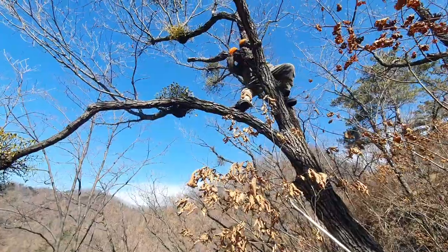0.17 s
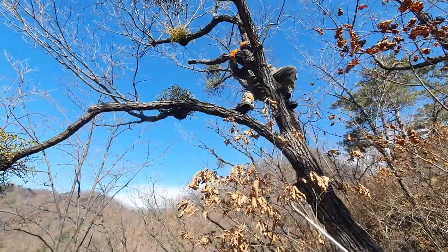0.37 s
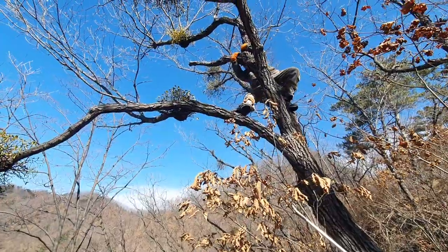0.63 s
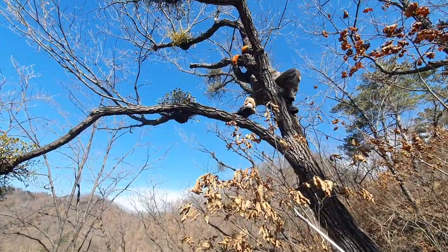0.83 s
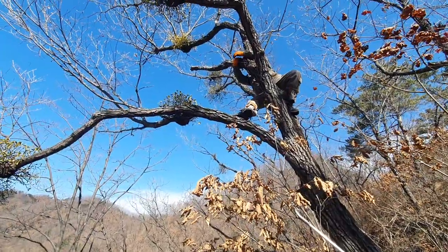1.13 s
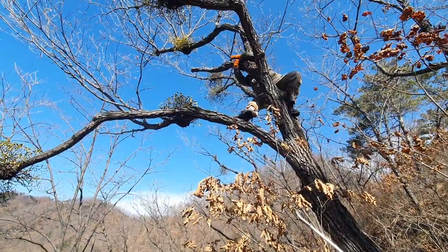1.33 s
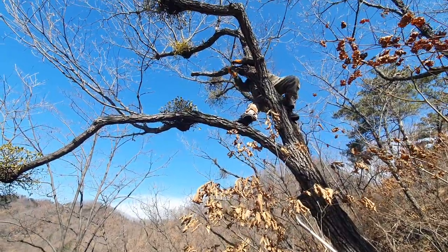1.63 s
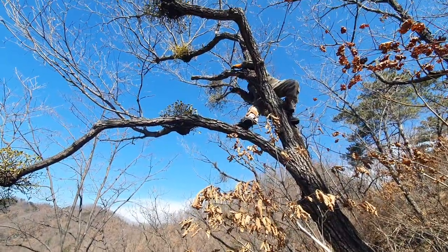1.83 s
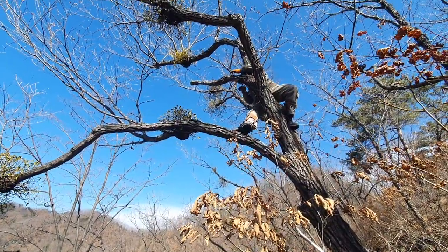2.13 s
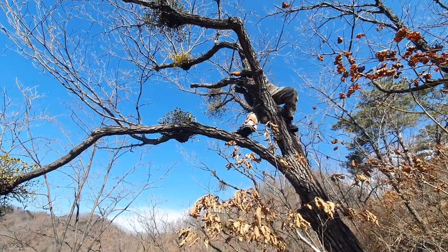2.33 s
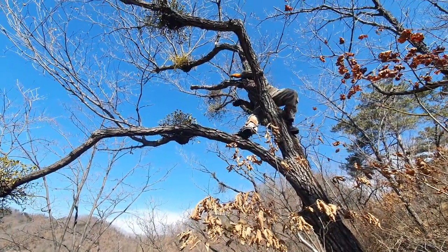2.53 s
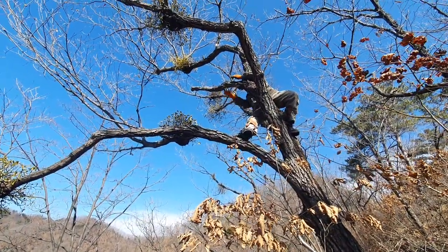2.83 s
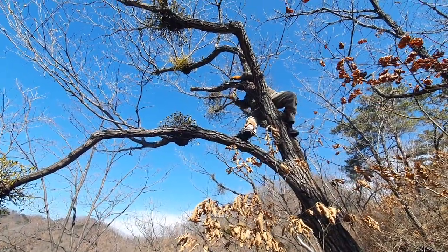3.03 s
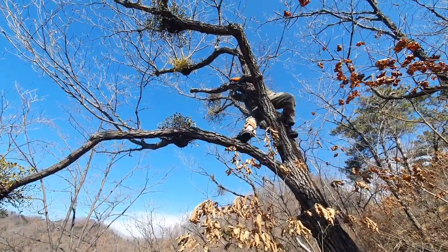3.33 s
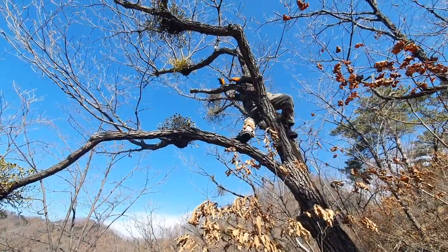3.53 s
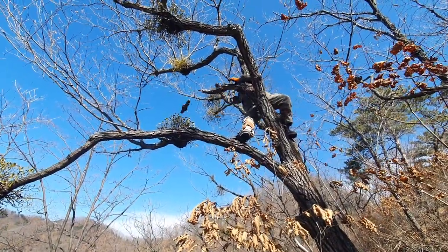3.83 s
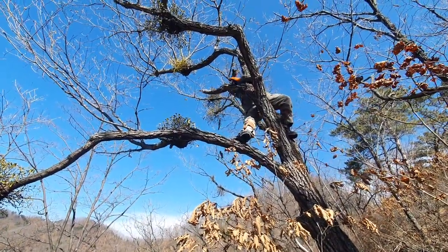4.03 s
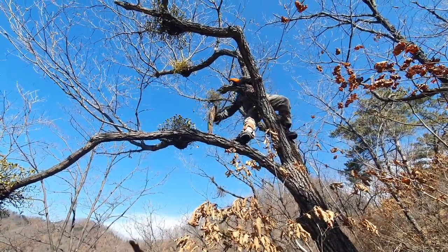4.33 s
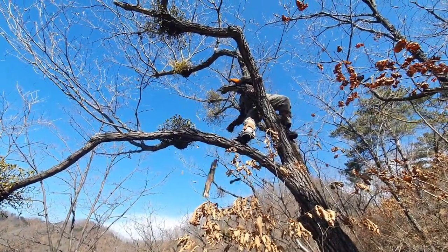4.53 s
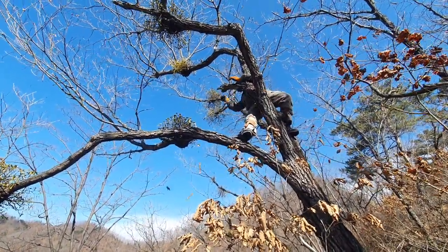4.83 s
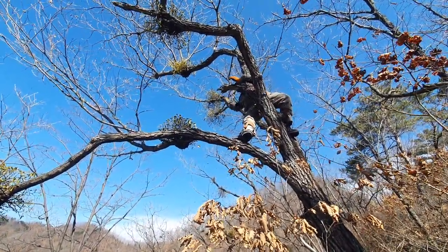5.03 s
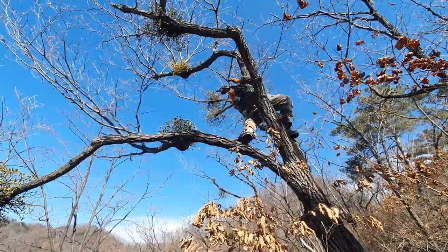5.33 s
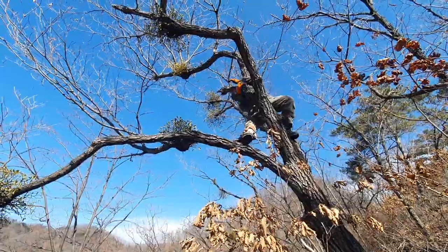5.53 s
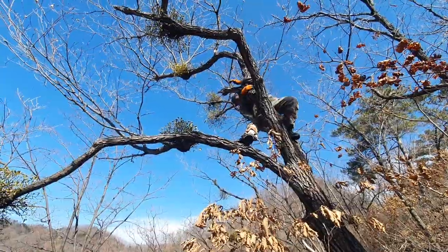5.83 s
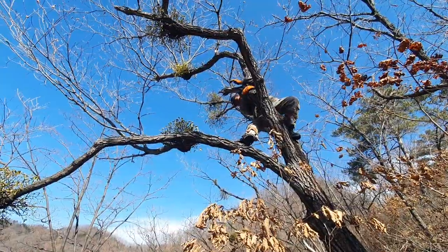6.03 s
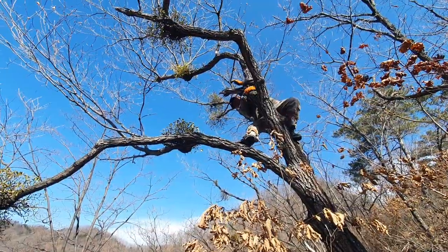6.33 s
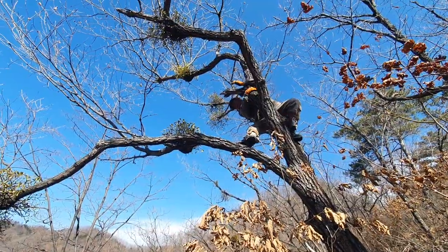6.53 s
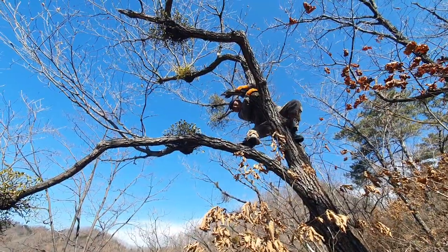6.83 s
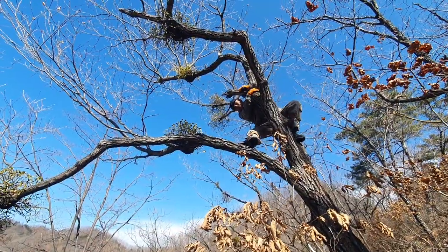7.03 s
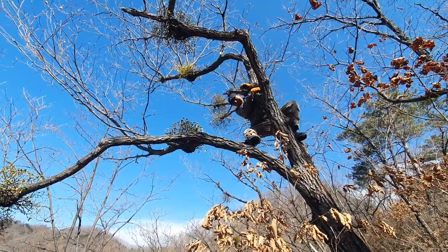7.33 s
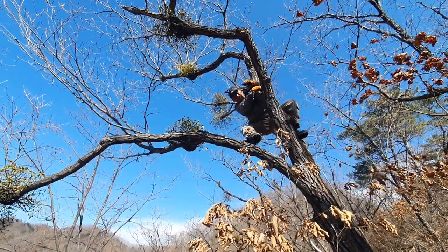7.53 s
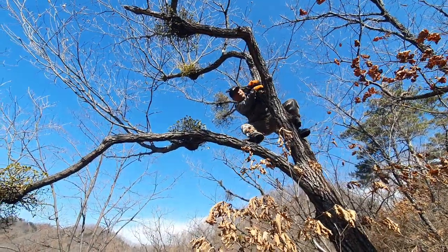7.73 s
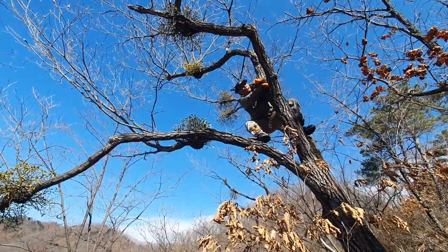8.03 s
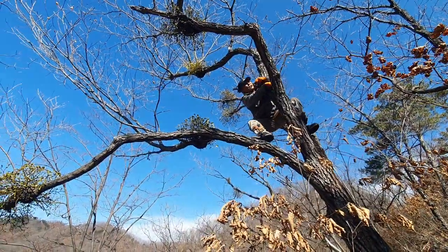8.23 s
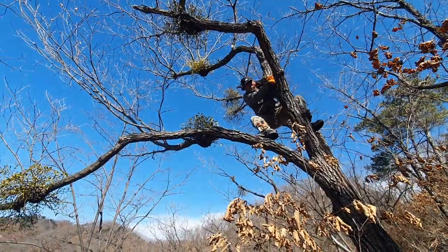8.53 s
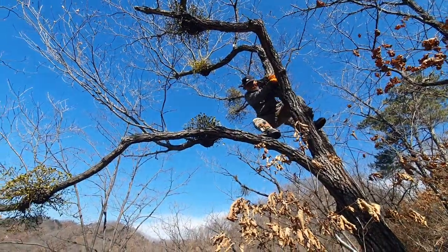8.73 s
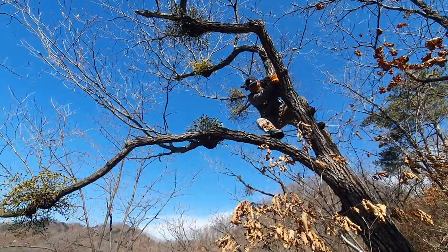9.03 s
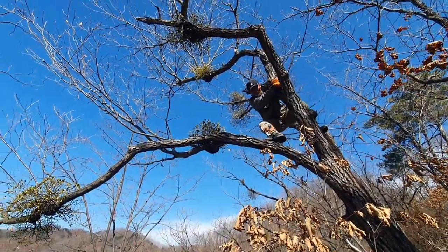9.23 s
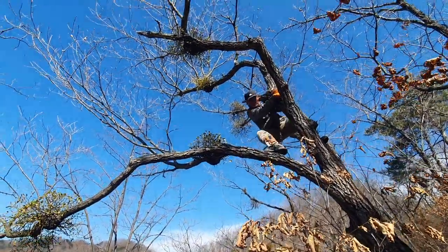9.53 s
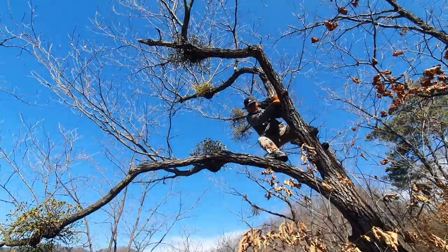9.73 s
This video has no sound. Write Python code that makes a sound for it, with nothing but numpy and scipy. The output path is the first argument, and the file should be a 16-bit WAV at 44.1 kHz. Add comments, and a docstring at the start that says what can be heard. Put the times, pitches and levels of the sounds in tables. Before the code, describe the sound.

Twigs snap and dry leaves crackle on a winter hillside as broken wood crashes, knocks hard on the ground and rolls through litter, faint crow beyond.

```python
"""Dead wood crashes into the dry leaves of a wooded winter slope: noise bursts with ringing fibres.
Two heavy chunks thud down, each a resonant knock over bouncing ground; wood tumbles in dense crackle.
Feet shift in sparser crackle, twigs snap, boots scuff, and wood knocks and creaks.
A crow caws far off in paired tones, the trunks give a thin echo, and filtered noise makes a light wind."""
import sys
import numpy as np
from scipy import signal
from scipy.fft import rfft, irfft, next_fast_len
from scipy.io import wavfile
from scipy.ndimage import uniform_filter1d

SR = 44100
rng = np.random.default_rng(int(sys.argv[2]) if len(sys.argv) > 2 else 0)


def generate_wav(signal):
    """Clip the signal to [-1, 1] and save it as 16-bit WAV at the path in sys.argv[1]."""
    frames = np.transpose(np.atleast_2d(signal))
    scaled = np.clip(frames, -1, 1) * 32767
    pcm = np.round(scaled).astype(np.int16)
    wavfile.write(sys.argv[1], SR, pcm)


N = 435708
TIME = np.arange(N) / SR
TOP_HZ = 16000

# All levels in the tables are relative; the functions add their own trims on top.
# gusts over a light, steady wind: middle_s, half_length_s, level_db
GUSTS = [(0.5, 0.32, -50.5), (1.1, 0.3, -52), (5.1, .4, -51)]
CALM_DB = -58
# distant caws: start_s, length_s, level_db
CAWS = [(0.0, 0.11, -68), (0.562, 0.26, -59), (1.412, .26, -60), (2.299, 0.24, -65.5), (3.173, 0.21, -65)]
# boots scuffing: middle_s, half_length_s, level_db
SCUFFS = [(2.202, 0.3, -66.5), (5.824, 0.072, -50), (6.47, 0.025, -57), (6.923, 0.05, -55),
          (7.348, 0.042, -50.5), (8.088, 0.087, -53.5), (8.564, 0.077, -59), (8.767, 0.063, -58),
          (9.543, 0.076, -57)]
# a bent branch creaks once: start_s, length_s, start_pitch_hz, end_pitch_hz, level_db
CREAK = (6.025, 0.07, 880, 660, -45)
# hollow knocks of wood on wood and root: start_s, pitch_hz, level_db
KNOCKS = [(5.303, 264, -33), (5.724, 398, -46), (5.835, 390, -47), (8.735, 1590, -48.5), (8.985, 149, -42)]
# weight shifting on dry leaves: middle_s, half_length_s, level_db
SHIFTS = [(0.1, 0.48, -58), (1.15, 0.39, -57.5), (8.05, 0.19, -59.5), (8.8, 0.24, -64), (9.42, 0.27, -62)]
# leaves never lie quite still; after a blow or the tumble they settle, fading evenly in dB
STILL_DB = -66.5
JOLT_DB, JOLT_FADE_DB_PER_S = -54.5, 34.5
SETTLE_DB, SETTLE_FADE_DB_PER_S = -43.5, 7.5
# the loudest twigs and stiff leaves breaking: start_s, crack_db, splinter_db, woody_body_db, ring_hz
SNAPS = [(0.051, -43, -38.5, -24, 4840), (0.161, -18.5, -43, -16, 2730), (0.253, -16.5, -57, -33, 3800),
         (0.425, -47, -41.5, -30, 3400), (0.737, -25, -38, -10.5, 3900), (0.788, -24.5, -59, 4, 1430),
         (1.038, -25, -43, -10, 6850), (1.055, -15.5, -48, -16, 1790), (1.461, -14.5, -44, -16, 3480),
         (1.569, -32, -43, -8, 1720), (1.685, -40.5, -41, -24, 5050), (1.709, -42, -42, -25, 5500),
         (1.747, -33, -50, -4.5, 3250), (1.805, -38, -49, -16, 3560), (2.46, -17, -30.5, -11.5, 4160),
         (2.482, -22, -38, -5, 3190), (2.503, -22, -62, 2.5, 1760), (2.549, -26, -42, -37, 7560),
         (3.295, -24, -32, -14.5, 3860), (3.427, -26, -40.5, -38, 3140), (3.809, -18, -35, -6, 2000),
         (3.827, -26, -35, -31, 6350), (3.989, -28, -48.5, -42, 4740), (4.274, -33.5, -37.5, -4.5, 4480),
         (5.035, -10, -32, -10.5, 2820), (5.937, -25, -32, -28, 5360), (5.982, -18, -32.5, -19, 3970),
         (6.018, -37, -31.5, -14, 2980), (6.241, -17, -40.5, -37, 4780), (6.446, -41, -35.5, -13.5, 4160),
         (6.472, -26, -34, -35, 3960), (6.654, -37, -34, -21, 2330), (6.712, -30, -34, -18.5, 2570),
         (7.266, -29, -40.5, -25, 4800), (7.748, -17.5, -53, -35, 5960), (8.383, -22, -59, -34, 4160),
         (8.718, -33, -47, -19, 5000), (9.175, -36.5, -43.5, -35, 2470), (9.269, -16, -46.5, -28, 6460),
         (9.441, -23, -51, -31, 7700), (9.557, -35, -42.5, -25, 5200)]
# wood tumbling through the litter, with the level of its steady ploughing
TUMBLE_START_S, TUMBLE_END_S, PLOUGH_DB = 4.83, 5.91, -40.5
# surges as the wood rolls, the last two gentle: middle_s, half_length_s, level_db
ROLLS = [(4.9, 0.03, -35.5), (5.125, 0.079, -33), (5.33, 0.033, -35), (5.81, 0.013, -42),
         (6.79, .14, -45.5), (7.31, 0.073, -49.5)]
# wood crashing into the litter: start_s, crack_db, splinter_db, woody_body_db, ring_hz
CRASHES = [(2.852, -4, -21, -17.5, 2080), (2.881, -1, -19.5, -13.5, 3520), (2.931, -26, -26, -14, 4300),
           (4.844, -24, -36.5, -8, 2310), (4.895, -27, -32.5, -13, 3240), (5.096, -13, -31, -2, 2380),
           (5.118, -16, -25, -33, 1770), (5.138, -3, -27.5, -23, 2620), (5.301, -8.5, -38, 1, 1960)]
# heavy chunks landing: strike_s, blow_db, ground_thump_db, contact_s, crushed_leaf_lead_s
LANDINGS = [(3.736, -6.5, -19.5, 0.0015, .011), (4.3727, -8.5, -18.5, 0.0011, .007)]
# resonances of the wood, one list per landing chunk: pitch_hz, width_hz, level_db
CHUNKS = [
    [(805, 93, -5), (1093, 136, 5), (1720, 100, -4.5), (2270, 268, -10), (3020, 290, -3), (4050, 270, -27)],
    [(750, 92, 4.5), (1074, 62, 1.5), (1560, 85, 3), (2720, 69, -3.5), (3900, 240, 1), (7260, 260, -7)],
]
# resonances of the springy forest floor: pitch_hz, level_db, t60_s
GROUND = [(75.6, -1.5, 0.34), (92, 5, 0.1), (121, 5.5, 0.12), (247, -4, 0.056), (305, -1, 0.086),
          (517, 2.5, 0.048)]
# direction of the activity: time_s, left_ear_lag_ms, left_minus_right_db
BEARING = [(0, 0.36, -4.5), (1.8, 0.29, -3), (2.5, 0.082, -5.5), (4.5, 0.076, -4), (5.8, 0.079, -2.5),
           (6.2, 0.19, -7), (7.6, 0.24, -5), (9.8, 0.36, -6)]
# spectrum of the wind rumble: frequency_hz, density_db (per Hz)
GUST = [(15, -31), (35, -8), (60, 2), (90, -0.5), (140, -5.5), (250, -18.5), (600, -52.5)]
# spectrum of the wind buffeting: frequency_hz, density_db (per Hz)
BUFFET = [(15, -2.5), (40, 2), (70, -6.5), (150, -16.5), (400, -46)]
# spectrum of the hillside hush: frequency_hz, density_db (per Hz)
AIR = [(90, -19), (170, -5.5), (350, -2), (600, -7), (1300, -14), (3000, -19.5), (7000, -24), (9100, -44),
       (12000, -48), (16000, -41.5)]
# spectrum of a dragging sole: frequency_hz, density_db (per Hz)
SCUFF = [(150, -12), (340, 0.5), (550, -5.5), (850, -5), (1700, -9), (3000, -10), (8000, -24)]
# spectrum of dry leaves: frequency_hz, density_db (per Hz)
LEAF = [(600, -27), (1400, -17), (2400, 0), (3800, 1.5), (5400, -1.5), (7400, -0.5), (9100, -16.5),
        (12000, -9), (16000, -8)]
# spectrum of stalks and woody crunch: frequency_hz, density_db (per Hz)
CRUNCH = [(120, -21), (260, -4), (450, -5), (750, -2), (1300, 1), (1900, 2.5), (3000, -7), (6000, -45)]
# spectrum of the bright part of a break: frequency_hz, density_db (per Hz)
TWIG = [(600, -25.5), (1500, -9), (2800, 0), (4200, 0.5), (5500, -1), (7500, 0), (9200, -17.5),
        (12000, -7.5), (16000, -12)]
# spectrum of a chunk's blow and its litter: frequency_hz, density_db (per Hz)
BLOW = [(100, 1), (250, 6.5), (400, -4.5), (1200, -1), (4000, -2.5), (5500, -9.5), (7500, -4),
        (9200, -28.5), (16000, -11)]


def undb(db):
    """Decibels to gain."""
    return 10 ** (np.asarray(db) / 20)


def unit(x):
    """Scale to rms 1."""
    return x / np.sqrt(np.mean(x ** 2))


def curves(table):
    """Each column after the first as a curve in time."""
    s, *columns = np.transpose(table)
    return [np.interp(TIME, s, c) for c in columns]


def add(out, s, x):
    """Mix a sound into both channels at time s."""
    i = int(s * SR)
    out[:, i:i + x.shape[1]] += x[:, :N - i]


def colour(x, points):
    """Causal minimum-phase filter with the given spectrum and unit power gain."""
    size = 2 * next_fast_len(x.shape[-1] // 2 + 1024)
    hz, db = np.transpose(points)
    bins_hz = np.arange(size // 2 + 1) * SR / size
    gain = unit(undb(np.interp(np.log(bins_hz + 1), np.log(hz), db)))
    # folding the cepstrum forward in time makes the filter causal
    cepstrum = irfft(np.log(gain))
    cepstrum[1:size // 2] *= 2
    cepstrum[size // 2 + 1:] = 0
    return irfft(rfft(x, size) * np.exp(rfft(cepstrum)))[..., :x.shape[-1]]


def resonate(x, hz, width_hz):
    """Two-pole resonance, gain 1 at its centre."""
    return signal.lfilter(*signal.iirpeak(min(hz, SR / 3), hz / min(width_hz, SR / 4), fs=SR), x)


def noise(size, apart):
    """Stereo noise; apart 0 is the same in both ears, 1 unrelated."""
    mid, side = rng.standard_normal((2, size))
    return unit(mid + apart * np.array([side, -side]))


def wander(size, span):
    """Random drift of rms 1, smoothed over span samples."""
    return unit(uniform_filter1d(rng.standard_normal(size), size=span))


def steady(x, span_s):
    """Even out the level over spans longer than span_s, keeping the fine grain."""
    return x / np.sqrt(uniform_filter1d(np.mean(x ** 2, axis=0), int(span_s * SR) + 1) + 1e-12)


def swells(table):
    """Power of smooth swells, each rising and falling about its middle."""
    return sum(undb(db) ** 2 * np.exp(-((TIME - s) / half_s) ** 2) for s, half_s, db in table)


def settling(s, db, fade_db_per_s):
    """Power of leaves disturbed at time s and coming to rest."""
    return (TIME >= s) * undb(db - fade_db_per_s * np.maximum(TIME - s, 0)) ** 2


def tumbling(fade_s=0.13):
    """1 while the wood tumbles, fading to 0 as it comes to rest."""
    return (TIME >= TUMBLE_START_S) * np.clip(1 - (TIME - TUMBLE_END_S) / fade_s, 0, 1)


def crisp(x, edge_hz=9000):
    """Only the brittle top of a sound."""
    return signal.sosfiltfilt(signal.butter(2, min(edge_hz, SR / 3), "high", fs=SR, output="sos"), x)


def crackle(rate, spread_db, ring_s, apart, hiss_db, clump_db, count=28):
    """Tiny leaf fractures, rate per second over count pitches; they clump, and a few are far louder."""
    t = np.arange(SR // 50) / SR
    out = 0
    for hz in np.geomspace(900, 14000, count):
        ring = noise(len(t), apart) * np.exp(-t / ring_s)
        ring = unit(ring + 3.5 * resonate(ring, hz, hz / 5))
        # one random column places each click, the other sets its level
        draws = rng.random((int(rate * N / SR / count), 2))
        clicks = np.zeros(N)
        clicks[(draws[:, 0] * N).astype(int)] = undb(-spread_db * np.log(draws[:, 1] + 0.033))
        out = out + signal.oaconvolve(ring, clicks[None])[:, :N]
    clumps = undb(clump_db * wander(N, 600))
    return steady(clumps * (unit(out) + undb(hiss_db) * noise(N, 1.0)), 0.09)


def breeze(wind_db=2, buffet_db=-6, flutter_db=2.5, air_db=-62, pan_db=-4):
    """Wind rumbles and buffets the ears, stronger on the right and slowly wavering; the hillside hushes."""
    wind = np.sqrt(undb(CALM_DB) ** 2 + swells(GUSTS))
    eddies = unit(signal.resample(rng.standard_normal(120), N))
    ears_db = np.array([[pan_db], [-pan_db]]) / 2
    rumble = colour(noise(N, 0.5), GUST) + undb(buffet_db) * colour(noise(N, 0.85), BUFFET)
    hush = undb(air_db) * colour(noise(N, 0.85), AIR)
    return rumble * wind * undb(wind_db + ears_db + flutter_db * eddies) + hush


def trunks(x, echo_db=-23, t60=0.22, dull_hz=4500):
    """Scattered reflections from the trees, duller than the direct sound."""
    t = np.arange(SR) / SR
    # the steep power leaves few strong reflections, none before 12 ms
    echo = noise(SR, 1) * rng.random(SR) ** 8 * undb(-60 * t / t60) * (t > .012)
    echo = signal.lfilter(*signal.butter(1, min(dull_hz, SR / 3), fs=SR), echo)
    return x + undb(echo_db) * signal.oaconvolve(x, unit(echo) / np.sqrt(SR), axes=1)[:, :N]


def crow(throat_hz=1350, arch=.12, rasp=0.026, lower_db=-9, hoarse_db=-9, flutter_db=3):
    """Arched, hoarse caws; at this distance only two strands near the throat resonance carry."""
    out = np.zeros((2, N))
    for s, length, db in CAWS:
        u = np.linspace(0, 1, int(length * SR))
        waver = wander(len(u), 200)
        hz = throat_hz * (1 - arch + arch * np.sin(np.pi * u ** .7) + rasp * waver)
        phase = 2 * np.pi * np.cumsum(hz) / SR
        breath = resonate(resonate(noise(len(u), 0.67), 1280, 300), 1280, 300)
        strands = np.sin(phase) + undb(lower_db) * np.sin(phase * 4 / 5)
        caw = strands + undb(hoarse_db) * unit(breath)
        flutter = wander(len(u), 900)
        add(out, s, caw * undb(db + flutter_db * flutter) * np.sqrt(np.abs(np.sin(np.pi * u))))
    return out


def creak(jitter=0.095):
    """Wood slips on wood, fast and unevenly, slowing as the strain lets go."""
    s, length, start_hz, end_hz, db = CREAK
    u = np.linspace(0, 1, int(length * SR))
    hz = (start_hz + (end_hz - start_hz) * u ** 2) * (1 + jitter * wander(len(u), 80))
    out = np.zeros((2, N))
    add(out, s, undb(db) * np.sin(np.pi * u) * np.sin(2 * np.pi * np.cumsum(hz) / SR)[None])
    return out


def knocks(ring_s=0.021, rise_s=0.0015, sharpness=8):
    """A rough contact sets one dull resonance of the wood going."""
    t = np.arange(SR // 4) / SR
    out = np.zeros((2, N))
    for s, hz, db in KNOCKS:
        contact = noise(len(t), .2)
        ring = unit(resonate(resonate(contact, hz, hz / sharpness), hz, 2 * hz / sharpness))
        add(out, s, undb(db) * steady(ring, 0.054) * np.exp(-t / ring_s) * (1 - np.exp(-t / rise_s)))
    return out


def scuffs(slip_db=3):
    """A sole sticks and slips unevenly as it drags."""
    slips = undb(slip_db * wander(N, 200))
    pressure = sum(undb(db) * np.exp(-((TIME - s) / half_s) ** 2 / 2) for s, half_s, db in SCUFFS)
    return colour(pressure * unit(slips * noise(N, 0.27)), SCUFF)


def underfoot(level_db=3, body_db=-11, crisp_db=-2):
    """Sparse crackle of litter settling after falls, crisper as weight shifts; it yields to the tumble."""
    falls = [CRASHES[0][0]] + [row[0] for row in LANDINGS]
    jolts = sum(settling(s, JOLT_DB, JOLT_FADE_DB_PER_S) for s in falls)
    after_tumble = settling(TUMBLE_END_S, SETTLE_DB, SETTLE_FADE_DB_PER_S)
    shifts = swells(SHIFTS)
    stir = np.sqrt(undb(STILL_DB) ** 2 + shifts + jolts + after_tumble)
    grains = crackle(rate=900, spread_db=8.5, ring_s=0.0022, apart=1.0, hiss_db=-2, clump_db=1.5)
    leaves = colour(grains, LEAF)
    litter = (leaves + undb(body_db) * colour(grains, CRUNCH)) * stir
    brittle = undb(crisp_db) * crisp(leaves) * np.sqrt(shifts)
    return (litter + brittle) * undb(level_db) * (1 - tumbling())


def breaks(table, crack_db, crack_s, splinter_db, splinter_t60, body_db, settle_db, settle_t60,
           grain_db, rise_s, ring_db):
    """Each break is a sharp crack, a run of splinters and a settling of the leaves round it."""
    t = np.arange(SR // 2) / SR
    out = np.zeros((2, N))
    for s, row_crack_db, row_splinter_db, wood_db, ring_hz in table:
        grain = undb(grain_db * wander(len(t), 50))
        fade = undb(-60 * t / splinter_t60) + undb(settle_db - 60 * t / settle_t60)
        crack = undb(row_crack_db + crack_db) * np.exp(-t / crack_s)
        force = crack + undb(row_splinter_db + splinter_db) * fade
        force = force * (1 - np.exp(-t / rise_s))
        # every piece sounds a pitch of its own
        fibres = noise(len(t), .6)
        fibres = fibres + undb(ring_db) * resonate(fibres, ring_hz, ring_hz / 9)
        bright = colour(force * steady(grain * fibres, 0.0087), TWIG)
        woody = colour(force * steady(grain * noise(len(t), 0.64), 0.0087), CRUNCH)
        add(out, s, bright + undb(wood_db + body_db) * woody)
    return out


def twig_snaps():
    """Twigs and stiff leaves give a very short crack and quick splinters."""
    return breaks(SNAPS, crack_db=-9.0, crack_s=0.0011, splinter_db=0, splinter_t60=0.043, body_db=6.5,
                  settle_db=-6.5, settle_t60=0.16, grain_db=2.5, rise_s=0.0011, ring_db=8)


def slide(level_db=1, body_db=-7.5, dig_db=-9.5, crisp_db=-1):
    """A dense rush of leaves over crunching stalks surges with each roll; the hardest rolls are crispest."""
    plough = (undb(PLOUGH_DB) * tumbling()) ** 2
    rolls = swells(ROLLS)
    leaf_grains = crackle(rate=1700, spread_db=5.5, ring_s=0.0034, apart=0.48, hiss_db=-8, clump_db=2.0)
    stalk_grains = crackle(rate=900, spread_db=5.5, ring_s=0.0039, apart=0.28, hiss_db=-9, clump_db=2.5)
    leaves, stalks = colour(leaf_grains, LEAF), colour(stalk_grains, CRUNCH)
    brittle = undb(crisp_db) * crisp(leaves) * rolls / np.sqrt(rolls.max())
    rush = leaves * np.sqrt(plough + rolls) + brittle
    crunch = stalks * np.sqrt(undb(body_db) ** 2 * plough + undb(dig_db) ** 2 * rolls)
    return (rush + crunch) * undb(level_db)


def crashing_wood():
    """Falling wood gives a longer crack than a twig, and the leaves settle more slowly round it."""
    return breaks(CRASHES, crack_db=-15.5, crack_s=0.0023, splinter_db=0.5, splinter_t60=0.069, body_db=6.5,
                  settle_db=-8.5, settle_t60=0.42, grain_db=1.5, rise_s=0.0014, ring_db=6.5)


def landings(crush_db=-14, scatter_db=-19, scatter_s=0.022, settle_db=-32, settle_s=0.034, ring_db=4.0):
    """A chunk crushes the leaves, strikes the soil with a dead knock and scatters litter; the ground bounces."""
    out = np.zeros((2, N))
    for (s, blow_db, thump_db, contact_s, lead_s), modes in zip(LANDINGS, CHUNKS):
        t = np.arange(SR // 2) / SR - lead_s  # the strike is at 0
        after = np.maximum(t, 0)
        crush = undb(crush_db) * np.sqrt(np.clip(1 + t / lead_s, 0, 1))
        scatter = undb(scatter_db) * np.exp(-after / scatter_s) + undb(settle_db) * np.exp(-after / settle_s)
        litter = colour(np.where(t < 0, crush, scatter) * noise(len(t), 0.38), BLOW)
        push = np.exp(-(t / contact_s) ** 2 / 2) * steady(noise(len(t), 0.45), 0.0012)
        ring = sum(undb(db) * unit(resonate(push, hz, width)) for hz, width, db in modes)
        knock = unit(unit(colour(push, BLOW)) + undb(ring_db) * unit(ring)) * np.std(push)
        thump = sum(undb(db - 60 * after / t60) * np.sin(2 * np.pi * hz * after) for hz, db, t60 in GROUND)
        thump = undb(thump_db) * thump * (1 - np.exp(-after / 0.01))
        # the ground gives way first, so its thump starts downward
        add(out, s - lead_s, undb(blow_db) * (knock + litter) - thump)
    return out


def scene():
    """The rustling lies to the right, so it reaches the left ear late and weak; the chunks land straight ahead."""
    activity = twig_snaps() + crashing_wood() + underfoot() + slide()
    lag_ms, pan_db = curves(BEARING)
    left, right = activity * undb(np.array([pan_db, -pan_db]) / 2)
    late = np.clip(np.arange(N) - np.round(lag_ms * SR / 1000).astype(int), 0, N - 1)
    placed = np.array([left[late], right])
    return trunks(placed + landings() + scuffs() + knocks() + creak() + crow()) + breeze()


def record(dry):
    """The recorder rounds off the loudest peaks and cuts the top."""
    limited = dry / (1 + (dry / .85) ** 6) ** (1 / 6)
    return signal.sosfilt(signal.ellip(10, .2, 80, TOP_HZ, fs=SR, output="sos"), limited)


dry = scene()
out = record(dry)
generate_wav(out)
```